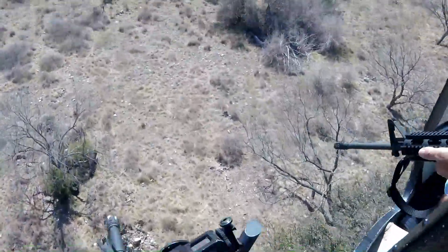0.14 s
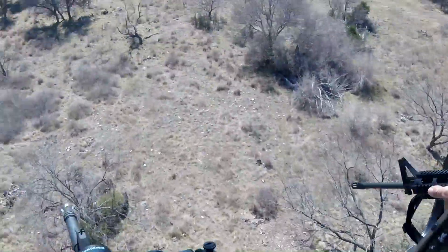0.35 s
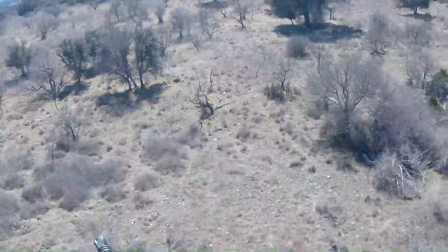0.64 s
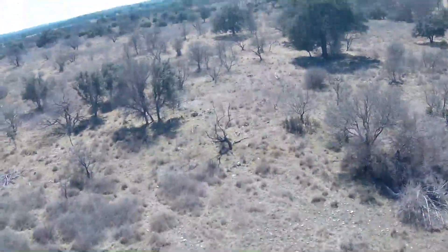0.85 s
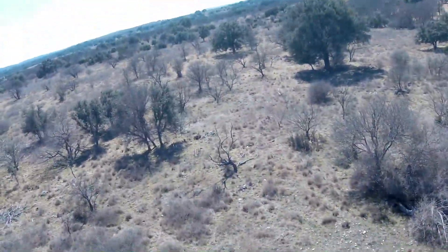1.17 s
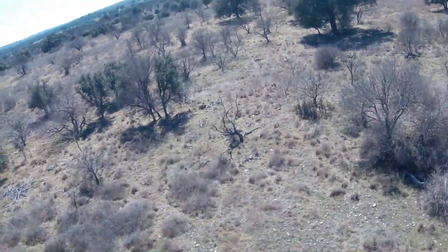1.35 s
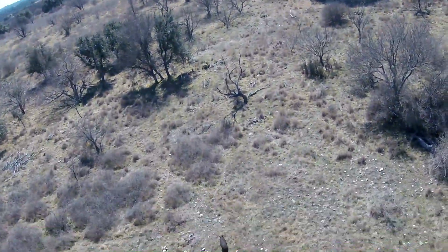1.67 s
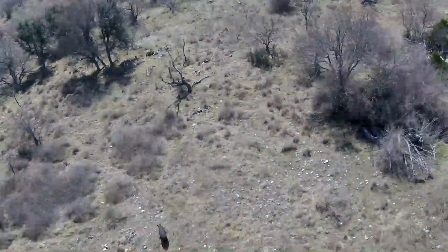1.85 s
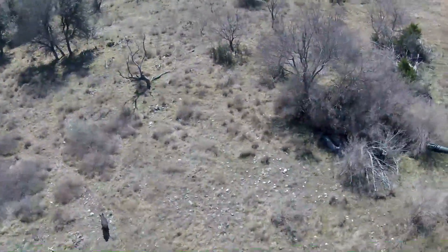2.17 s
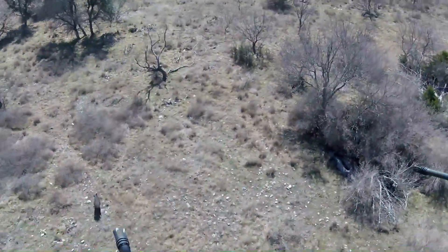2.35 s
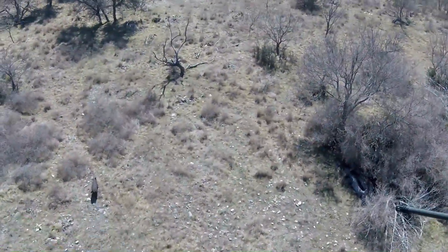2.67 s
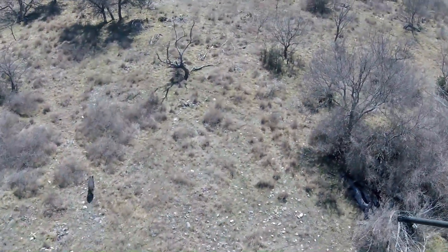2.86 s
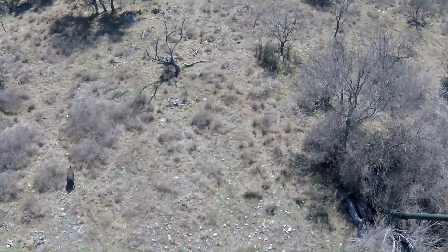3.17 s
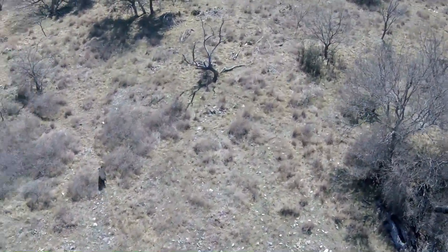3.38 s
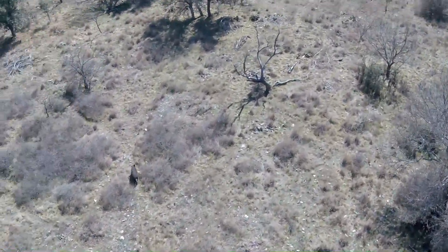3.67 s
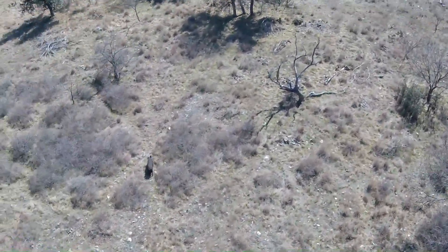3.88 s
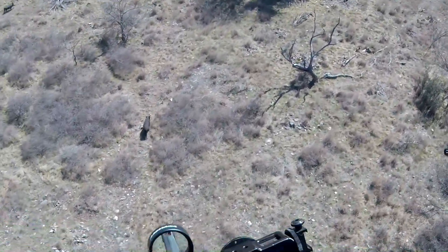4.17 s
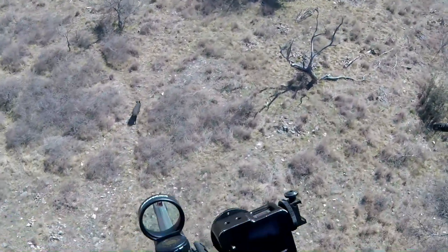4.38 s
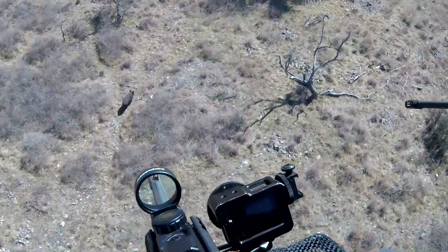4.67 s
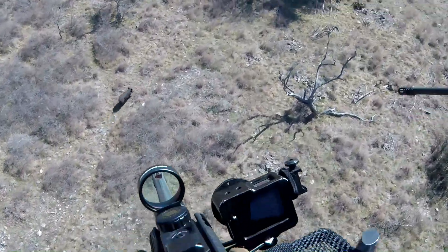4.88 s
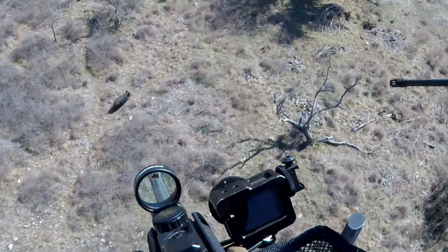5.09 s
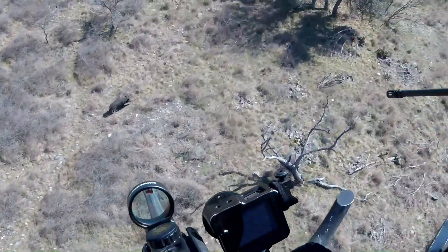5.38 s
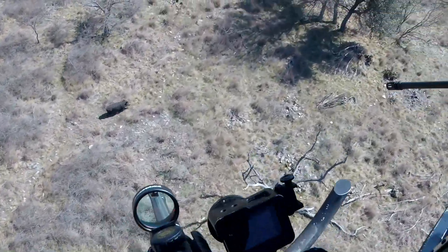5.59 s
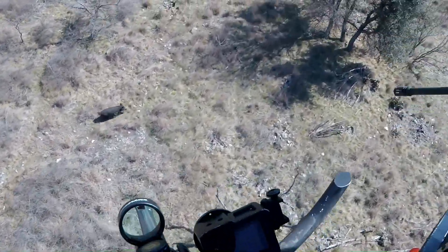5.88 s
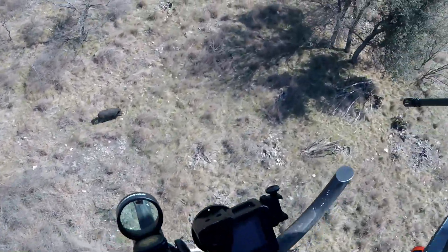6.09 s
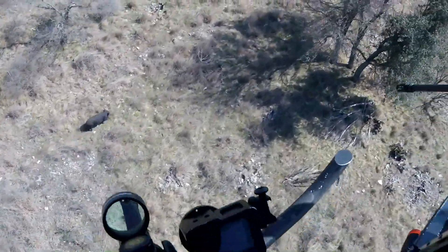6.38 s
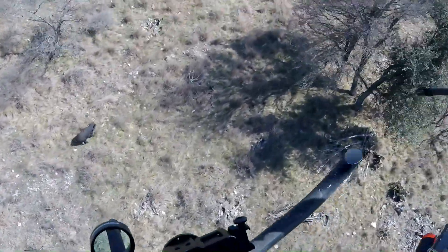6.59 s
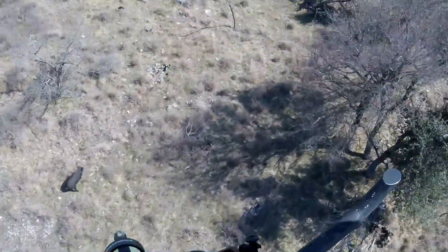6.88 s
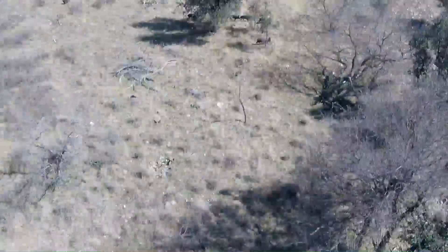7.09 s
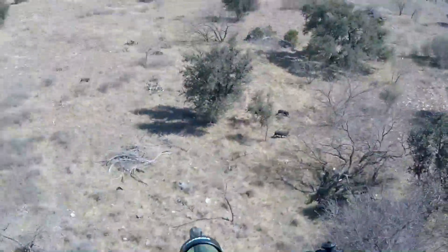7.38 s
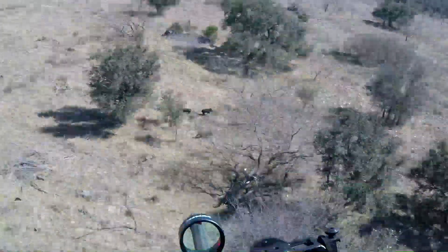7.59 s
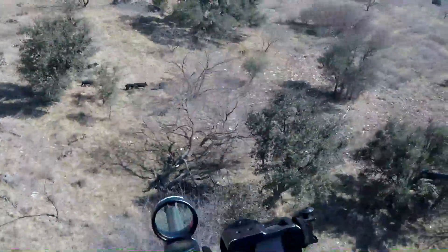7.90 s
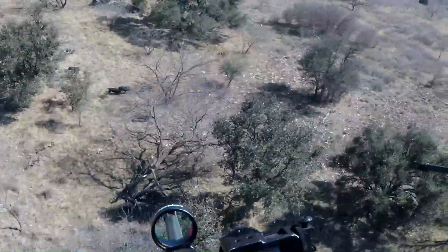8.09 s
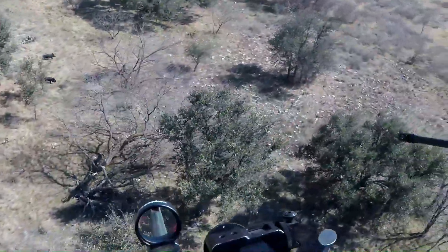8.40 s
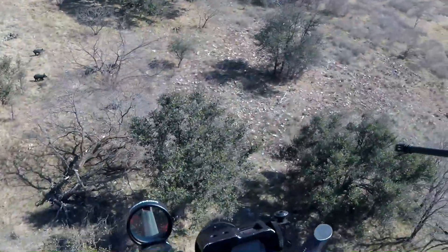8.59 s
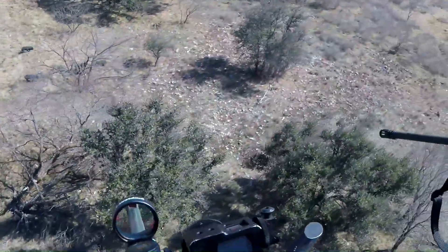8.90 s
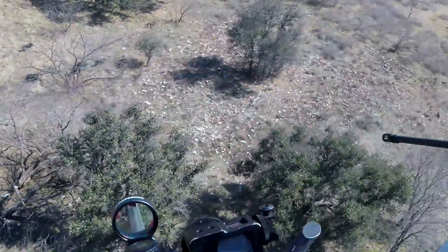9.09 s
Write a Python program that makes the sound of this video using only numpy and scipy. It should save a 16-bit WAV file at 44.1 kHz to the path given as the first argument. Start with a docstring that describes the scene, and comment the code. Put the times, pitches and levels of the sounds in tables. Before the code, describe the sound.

Four spaced rifle shots blast from the open door of a low-flying helicopter, with droning engine, fluttering blades and roaring wind.

```python
"""Four rifle shots from the open door of a two-blade piston helicopter flying low over brush.
A grating, fluttering rasp swells just ahead of each blast of noise; a cabin boom, a metal tick and a
ground thump follow. Underneath, shaft harmonics drone, each blade pass swishes and chirps, and shaped
noise makes the slipstream, with gusts, slaps, midrange swells and a hoot at the door. A few clicks and
rattles sit in the cabin. Gain control ducks the mix after each shot and creeps back."""
import sys
import numpy as np
from scipy import signal
from scipy.fft import rfft, irfft
from scipy.io import wavfile
from scipy.ndimage import uniform_filter1d, minimum_filter1d

SR = 44100
rng = np.random.default_rng(int(sys.argv[2]) if len(sys.argv) > 2 else 0)


def dump(signal):
    """Clip the signal to [-1, 1] and save it as 16-bit WAV at the path in sys.argv[1]."""
    limited = np.clip(np.atleast_2d(signal).T, -1, 1)
    pcm = np.round(limited * 32767).astype(np.int16)
    wavfile.write(sys.argv[1], SR, pcm)


N = 407925
T = np.arange(N) / SR


def undb(db):
    """Level in dB to amplitude factor."""
    return 10 ** (np.asarray(db) / 20)


def unit(x):
    """Scale to rms 1."""
    return x / np.sqrt(np.mean(x ** 2))


def curves(table):
    """The columns of a table, joined by straight lines in time."""
    s, *columns = np.transpose(table)
    return [np.interp(T, s, column) for column in columns]


def noise(points, size=N):
    """Noise of rms 1 with a spectrum of (frequency [Hz], relative density [dB]) points."""
    hz, db = np.transpose(points)
    octave = np.log2(np.fft.rfftfreq(size, 1 / SR) + 1)
    colour = undb(np.interp(octave, np.log2(hz), db))
    return unit(irfft(rfft(rng.standard_normal(size)) * colour, size))


def walk(rate):
    """Smooth random drift of rms near 1, with about rate new targets per second."""
    k = max(int(SR / rate), 2)
    steps = np.repeat(rng.standard_normal(N // k + 1), k)
    return unit(uniform_filter1d(steps, k)[:N])


def fade(t, t60):
    """Dies away by 60 dB in t60 seconds."""
    return np.exp(-np.log(1000) * t / t60)


def onset(t, rise_s):
    """Rises from silence with time constant rise_s."""
    return 1 - np.exp(-t / rise_s)


def swells(table):
    """Sum of smooth bell-shaped swells, from rows of (time, half length, height)."""
    return sum(height * np.exp(-((T - s) / length) ** 2) for s, length, height in table)


def add(out, s, x):
    """Mix x into out from time s."""
    i = min(int(s * SR), N)
    out[i:i + len(x)] += x[:N - i]


def split_off(x, order, hz, kind):
    """The low or high part of x, without delay, so that x minus it leaves the rest."""
    return signal.sosfiltfilt(signal.butter(order, hz, kind, fs=SR, output="sos"), x)


def passing(blade, lead, depth_db, uneven_db):
    """Level in dB that peaks once a blade, lead passes early; one blade is louder than the other."""
    angle = np.pi * (blade + lead)
    return depth_db * (np.cos(2 * angle) + 0.18 * np.cos(4 * angle)) + uneven_db * np.cos(angle)


# Main rotor speed: (time [s], blade passes [Hz])
ROTOR_SPEED = [(0.0, 13.52), (1, 13.633), (2.0, 13.383), (3.0, 13.145), (3.6, 12.995), (4.5, 13.253),
               (5.5, 13.753), (6.5, 13.743), (7.7, 13.904), (9.25, 13.688)]


def rotor_phase():
    """The turning rotor, counted in blade passes; it times everything geared to or beaten by the rotor."""
    return np.cumsum(curves(ROTOR_SPEED)[0]) / SR


def drone(turns, orders, waver_db):
    """Harmonics of a shaft; turbulent air makes each waver in level and phase."""
    out = np.zeros(N)
    for k, db in orders:
        level = undb(db + waver_db * walk(7))
        phase = 2 * np.pi * (k * turns + rng.random()) + 0.17 * walk(9)
        out += level * np.sqrt(2) * np.sin(phase)
    return out


# Exhaust harmonics: (multiple of the cycle of three cylinders, relative level [dB])
EXHAUST_ORDERS = [(1, -2), (2, -0.5), (3, -7), (4, -7.5), (5, -9.5), (6, -8.5), (7, -14), (11, -18.5)]
# Rotor harmonics: (multiple of that rotor's blade rate, relative level [dB])
MAIN_ROTOR_ORDERS = [(1, -4.5), (2, -5), (3, -1.5), (4, -5.5), (8, -4.5)]
TAIL_ROTOR_ORDERS = [(1, 0), (2, -5.5), (3, -13.5), (4, -17.5), (5, -27), (6, -22)]
# Fader of the engine and rotor drone: (time [s], level [dB])
DRONE_LEVEL = [(0, -14), (.35, -14), (.8, -15.5), (1.4, -16), (1.75, -19), (2.35, -18), (2.9, -19),
               (3.6, -18.5), (4.4, -19), (4.87, -27), (5.5, -18.5), (6.1, -15), (6.5, -24), (7.2, -18),
               (8, -20), (9.15, -17)]
EXHAUST_RATIO, TAIL_RATIO = 5, 5.93  # cycles per main blade pass


def machine(blade):
    """Exhaust, main rotor and tail rotor, all geared to one shaft."""
    lines = undb(0.5) * drone(EXHAUST_RATIO * blade, EXHAUST_ORDERS, waver_db=1.5)
    lines += undb(-2.5) * drone(blade, MAIN_ROTOR_ORDERS, waver_db=3.5)
    lines += undb(-1.5) * drone(TAIL_RATIO * blade, TAIL_ROTOR_ORDERS, waver_db=2.5)
    return lines * undb(curves(DRONE_LEVEL)[0])


# Gusts that swell the buffeting, and lulls below zero: (time [s], half length [s], level change [dB])
GUST_SWELLS = [(0.997, 0.15, 7.5), (4.554, 0.29, 8.5), (6.042, 0.3, 14.5), (6.62, 0.44, -9),
               (7.155, .15, 9), (0.05, .2, 3), (1.194, 0.14, 5), (4.735, 0.036, 5), (4.84, .05, -9)]


def gusts():
    """Level in dB that gusts on the microphone add to the buffeting, each a smooth swell."""
    return swells(GUST_SWELLS)


# Slipstream at the door: (time [s], strength [dB], brightness [dB])
SLIPSTREAM = [(0, -2.5, 2.5), (.35, 5, 1), (.8, 2, 0), (1.3, 2, 4.5), (1.75, 0.5, 4.5), (2.35, 2, -2),
              (2.9, -1, 0.5), (3.6, -2.5, 4), (4.5, 0, 2), (4.66, -6, 0), (4.87, -12, 1), (5.5, -1.5, 3),
              (6.15, -1.5, 2), (6.5, -7, 4), (6.8, -8, 6), (7.4, -0.5, -4), (8, -0.5, -1.5), (9.15, 3, 1)]
# Colours of its low, middle and high layers: (frequency [Hz], relative density [dB])
BUFFET_COLOUR = [(8, -20), (18, -20), (35, 10), (65, 3), (110, -3), (170, -16.5), (300, -22.5), (700, -63)]
ROAR_COLOUR = [(60, -28), (130, 2.5), (230, -0.5), (400, -2), (560, -5.5), (820, -7.5), (1200, -14),
               (1800, -30.5), (3500, -34.5), (8000, -80)]
RUSH_COLOUR = [(400, -46), (1000, 3.5), (1600, 6), (2300, 0.5), (3000, -2.5), (4000, -12.5), (5300, -4.5),
               (6300, -13), (8500, -30), (10500, -22), (11800, -31), (15000, -31)]
BUFFET_DB, ROAR_DB, RUSH_DB = -17.5, -14.5, -30  # base levels, before wind and flutter
BUFFET_FOLLOWS, RUSH_FOLLOWS = 0.24, 0.49  # dB per dB of wind strength
ROAR_THINS, ROAR_BODY_HZ = 0.3, 426  # dB of roar body lost per dB of brightness; top of that body


def slipstream(blade):
    """Eddies tear past the door; each blade pushes a gust of downwash through them."""
    wind_db, bright_db = curves(SLIPSTREAM)
    downwash = passing(blade, lead=0.0058, depth_db=1.4, uneven_db=-0.16)
    eddies = walk(130)

    buffet_db = BUFFET_DB + BUFFET_FOLLOWS * wind_db + gusts() + 0.97 * walk(7.3)
    buffet = noise(BUFFET_COLOUR) * undb(buffet_db)

    roar_db = ROAR_DB + wind_db + downwash + 1.8 * eddies + 0.28 * walk(18)
    roar = noise(ROAR_COLOUR) * undb(roar_db)
    body = split_off(roar, 2, ROAR_BODY_HZ, "low")
    roar = roar - body + body * undb(-ROAR_THINS * bright_db)

    rush_db = RUSH_DB + RUSH_FOLLOWS * wind_db + bright_db
    rush_db += 0.64 * downwash + 0.92 * eddies + 0.5 * walk(6.9)
    rush = noise(RUSH_COLOUR) * undb(rush_db)
    # the blades chop the treble of the rush more deeply
    treble = split_off(rush, 2, 3600, "high")
    rush = rush - treble + treble * undb(passing(blade, lead=0.081, depth_db=2.0, uneven_db=0.8))
    # pressure waves of the exhaust chop the rush into a fine rattle
    exhaust = np.cos(2 * np.pi * EXHAUST_RATIO * blade)
    return buffet + roar + rush * undb(2.04 * exhaust)


def whistle(hz, width_hz):
    """A narrow band of noise around a moving pitch."""
    angle = 2 * np.pi * np.cumsum(hz + 110 * walk(1100) + 90 * walk(16)) / SR
    return unit(walk(width_hz) * np.sin(angle) + walk(width_hz) * np.cos(angle))


# Base levels of the blade noise, before the per-blade pulsing: (time [s], swish [dB], chirp [dB])
BLADE_LEVELS = [(0, -45.5, -41), (.8, -35, -42), (1.4, -42.5, -38), (2.1, -42, -41), (3.4, -39, -41.5),
                (4.2, -42, -41.5), (4.7, -43.5, -45), (5.5, -38, -40.5), (6.2, -45, -43), (6.8, -47, -52),
                (7.5, -41.5, -46), (8.2, -41.5, -39.5)]
# Colour of the swish: (frequency [Hz], relative density [dB])
SWISH_COLOUR = [(2000, -11), (4000, 1.5), (5500, 1), (7000, 0.5), (8500, 0.5), (10200, -3.5), (11600, -23),
                (14000, -15), (16000, -28)]
CHIRP_HZ, CHIRP_SWING, CHIRP_FALL = 4910, 0.093, 0.17  # centre; Doppler share of it; half fall [blade passes]


def blades(blade):
    """Each passing blade hisses, bright first and duller after, and gives a soft falling chirp."""
    swish_db, chirp_db = curves(BLADE_LEVELS)
    hiss = noise(SWISH_COLOUR)
    bright = split_off(hiss, 3, 7700, "high")
    swish = bright * undb(passing(blade, lead=0.077, depth_db=3.5, uneven_db=1.3))
    swish += (hiss - bright) * undb(passing(blade, lead=-0.11, depth_db=2.5, uneven_db=0.5))
    # the tip comes and goes, so its bands of noise drop quickly as it passes
    past = (blade + 0.72) % 1 - 0.7
    fall = np.tanh(past / CHIRP_FALL)
    swish += undb(2) * whistle(7600 - 1300 * fall, width_hz=1400) * np.exp(-(past / 0.18) ** 2)
    chirp = whistle(CHIRP_HZ * (1 - CHIRP_SWING * fall), width_hz=700)
    pulse_db = passing(blade, lead=0.15, depth_db=7.5, uneven_db=0.9)
    chirp *= undb(chirp_db + pulse_db + 1.0 * walk(10))
    return swish * undb(swish_db + 3.5 + 0.6 * walk(11)) + chirp


# Wind across the door frame: (time [s], hoot pitch before wobble [Hz], hoot [dB], hiss before pulsing [dB])
DOOR_FRAME = [(2.8, 77.8, -39, -47), (3.2, 75.9, -28, -48), (3.9, 83.9, -14.5, -35.5),
              (4.3, 91.9, -20, -37.5), (4.6, 95.7, -40, -35.5), (4.76, 103, -14, -38),
              (4.86, 97.26, -58, -82)]
# Colour of its hiss: (frequency [Hz], relative density [dB])
EDGE_COLOUR = [(3500, -29), (5200, -4), (6000, 6.5), (7500, 3.5), (8700, 1), (9500, -12), (12000, -35)]


def sideslip(blade):
    """Eddies shed from the door frame give a ragged hoot, mostly rising, and a hiss pulsed by the downwash."""
    hz, hoot_db, hiss_db = curves(DOOR_FRAME)
    ragged = 1 + 0.32 * walk(16)
    hoot = unit(ragged * np.sin(2 * np.pi * np.cumsum(hz + 6 * walk(25)) / SR))
    chop_db = passing(blade, lead=-0.06, depth_db=2.0, uneven_db=-0.5)
    hiss = noise(EDGE_COLOUR) * undb(hiss_db + chop_db + 1.5 * walk(22.58))
    return hoot * undb(hoot_db) + hiss


# Slaps of downwash: (time [s], level before the fade [dB], decay by 60 dB [s])
SLAP_HITS = [(.058, -6, .11), (.136, -5, .1), (.209, -5, .055), (1.31, -3, .07), (2.762, -12, .07),
             (2.835, -12, .06), (3.25, -7, .035), (3.279, -5, .04), (3.631, -6, .04), (4.464, -8, .04),
             (4.71, -9, .035), (4.747, -9, .06), (7.117, -8, .045), (7.411, -6, .05), (7.63, -7, .04),
             (7.769, -9, .035), (8.055, -7, .035), (9.157, -4, .04)]
# Colour of a slap: (frequency [Hz], relative density [dB])
SLAP_COLOUR = [(120, 0), (350, 18), (800, 14), (1400, 6), (2800, -5), (5000, -22), (10000, -38)]


def slaps(size=4096):
    """Downwash slaps the microphone now and then: short dull bursts of noise."""
    out, t = np.zeros(N), np.arange(size) / SR
    for s, db, t60 in SLAP_HITS:
        add(out, s, undb(db) * noise(SLAP_COLOUR, size=size) * fade(t, t60) * onset(t, 0.0005))
    return out


# Swells of midrange noise on top of the roar: (time [s], half length [s], level [dB])
MIDRANGE_SWELLS = [(.55, .15, -22), (1.023, 0.036, -16.5), (2.454, 0.26, -19.5), (4.56, 0.054, -23),
                   (5.66, 0.17, -22), (6.76, 0.5, -22)]
# Colour of that noise: (frequency [Hz], relative density [dB])
MIDRANGE_COLOUR = [(250, -23), (550, 4.5), (820, 1.5), (1250, -3), (1700, -18.5), (3000, -40)]


def midrange_swells():
    """A band of midrange noise, fluttering in level, swells and fades on top of the roar."""
    swell = swells([(s, length, undb(db)) for s, length, db in MIDRANGE_SWELLS])
    return noise(MIDRANGE_COLOUR) * swell * undb(2.2 * walk(110))


def rasp(modes, length, flutter_s=0.011, swell_s=0.0035, size=4096):
    """A fluttering ring in coarse grit over a low growl swells until the blast, which its last sample meets."""
    before = np.arange(size)[::-1] / SR  # time left until the blast
    flutter = 2 * np.pi * before / flutter_s
    phases = 2 * np.pi * rng.random((len(modes), 3))
    ring = np.zeros(size)
    for (hz, db), (a, b, c) in zip(modes, phases):
        # each mode wobbles in level and pitch with the flutter
        level = undb(db) * (1 + 0.5 * np.cos(flutter + a / 2))
        ring += level * np.sin(2 * np.pi * hz * before + b + np.sin(flutter + c))
    grit = noise([(800, -6), (2000, 0), (5000, -3), (8000, -9), (11000, -5), (15000, -11)], size=size)
    growl = noise([(40, -30), (130, 6), (260, 5), (500, -21), (1200, -34)], size=size)
    swell = 1 / (1 + np.exp((before - length) / swell_s))
    swell += undb(-17) * np.exp(-(before / (length + 0.012)) ** 4)
    return (unit(ring) + undb(-15) * grit + undb(-2) * growl) * swell


# Colour of the cabin after a shot: (frequency [Hz], relative density [dB])
BOOM_COLOUR = [(60, 0), (140, 16), (250, 9), (400, -6), (560, -8), (830, 11), (1150, -4), (3000, -32)]


def cabin_boom(t60=0.07, size=16384):
    """The blast sets the air of the cabin booming: coloured noise with a soft onset, dying away."""
    t = np.arange(size) / SR
    return noise(BOOM_COLOUR, size=size) * fade(t, t60) * onset(t, 0.0009)


def tick(t60, size=2048):
    """A short bright click of hard parts."""
    t = np.arange(size) / SR
    colour = [(800, -25), (1800, -7), (2800, -10), (4500, -4.5),
              (6000, 3.0), (8000, -3.0), (11000, -14), (15000, -28)]
    return noise(colour, size=size) * fade(t, t60) * onset(t, 0.001)


# Colour of the returning crack: (frequency [Hz], relative density [dB])
ECHO_COLOUR = [(100, 7), (500, 2), (1200, -19), (2500, -20), (5000, -24), (8000, -30), (12000, -70)]


def ground_echo(drop_hz=1200, end_hz=140, drop_s=0.0016, t60=0.036, crack_db=-13, size=4096):
    """The report comes back from soil and brush as a soft crack and a dull thump of falling pitch."""
    t = np.arange(size) / SR
    hz = end_hz + drop_hz * np.exp(-t / drop_s)
    thump = np.sin(2 * np.pi * np.cumsum(hz) / SR) * onset(t, 0.004) * fade(t, t60)
    crack = noise(ECHO_COLOUR, size=size) * onset(t, 0.001) * fade(t, 0.06)
    return thump + undb(crack_db) * crack


# Shots, levels before the gain control: (time [s], blast [dB], blast decay by 60 dB [s], cabin boom [dB],
# rasp [dB], rasp length [s], tick delay [s], tick [dB], ground echo [dB])
RIFLE_SHOTS = [(1.0776, 17, .028, 9, -9, .025, .0515, -10, 19),
               (5.8156, 19, .034, 9, -7.5, .027, .054, -12, 19),
               (6.2722, 7, .045, 14, -4.5, .011, .0455, -5, 9),
               (9.2215, 15, .034, 8, -6, .025, .046, -11, 12)]
# Ring of the rasp ahead of each blast, one list a blast: (frequency [Hz], relative level [dB])
RASP_MODES = [
    [(1800, 2), (2250, -4), (2500, 0), (3030, -5), (3310, 5), (4500, -6), (5400, 3), (6080, -11),
     (6420, -3), (7500, -4), (8500, -5), (9130, -8)],
    [(1420, 4), (2030, 4), (2230, 4), (2560, -4), (2970, 2), (3540, 4), (4870, 0), (5070, -2), (6470, -11),
     (7080, -13), (8600, -14)],
    [(1990, 2), (2470, 0), (2760, -3), (3260, 4), (3560, 1), (4720, -5), (5370, 5), (6150, -2), (8800, -10),
     (10170, -6)],
    [(1340, 4), (1650, -7), (1980, 5), (2500, -6), (2960, 2), (3550, 3), (3890, -9), (4420, -3), (4740, -8),
     (5580, -11), (6930, -7), (8350, -11)],
]
# Colour of the muzzle blast: (frequency [Hz], relative density [dB])
BLAST_COLOUR = [(30, -12), (150, 9), (500, 7), (900, 9), (1500, 3), (3000, -2), (6000, -4), (8000, -7),
                (9500, -13), (12000, -22), (16000, -25)]
ECHO_AFTER_S, TICK_T60_S = 0.074, 0.022


def rifles(size=16384):
    """Muzzle blast with a rasp just ahead of it and a short cabin tail, a tick of metal, then the ground echo."""
    out, t = np.zeros(N), np.arange(size) / SR
    for shot, modes in zip(RIFLE_SHOTS, RASP_MODES):
        s, blast_db, t60, boom_db, rasp_db, length, tick_after, tick_db, echo_db = shot
        ring = rasp(modes, length)
        add(out, s - len(ring) / SR, undb(rasp_db) * ring)
        blast = noise(BLAST_COLOUR, size=size) * (fade(t, t60) + undb(-23) * fade(t, 0.094))
        add(out, s, undb(blast_db) * blast + undb(boom_db) * cabin_boom())
        add(out, s + tick_after, undb(tick_db) * tick(t60=TICK_T60_S))
        add(out, s + ECHO_AFTER_S, undb(echo_db) * ground_echo())
    return out


# Bursts of chatter: (time [s], half length [s], level [dB])
RATTLE_BURSTS = [(2.768, .01, -26), (2.835, .014, -25), (2.92, .015, -29), (2.978, .01, -25)]
# Colour of the ringing part: (frequency [Hz], relative density [dB])
RATTLE_COLOUR = [(1300, -8), (2300, -4), (2950, 12), (3400, 2), (4200, -6), (7000, -6), (11000, -22)]


def rattle(uneven_db=4.0):
    """A small ringing part chatters unevenly in short bursts."""
    bursts = swells([(s, length, undb(db)) for s, length, db in RATTLE_BURSTS])
    return unit(noise(RATTLE_COLOUR) * undb(uneven_db * walk(300))) * bursts


# Sharp clicks in the cabin: (time [s], level before the fade [dB])
CLICK_HITS = [(2.938, -24), (3.122, -11.5), (9.151, -30)]


def cabin_clicks():
    """Sharp clicks in the cabin, each a short bright burst of noise."""
    out = np.zeros(N)
    for s, db in CLICK_HITS:
        add(out, s, undb(db) * tick(t60=0.058))
    return out


def scene():
    """One rotor phase, counted in blade passes, paces the machine, its blade noise and its downwash."""
    blade = rotor_phase()
    helicopter = machine(blade) + blades(blade)
    wind = slipstream(blade) + sideslip(blade) + slaps() + midrange_swells()
    cabin = rattle() + cabin_clicks()
    return (helicopter + wind + rifles() + cabin)[None]


def hold(over_db, release_db_per_s):
    """Follows each peak at once and lets go at a steady rate."""
    ramp = release_db_per_s * T
    return np.maximum.accumulate(over_db + ramp) - ramp


def limit(x, ceiling=1.25, size=48):
    """A fast limiter turns peaks down toward the ceiling, starting about a millisecond ahead."""
    gain = ceiling / np.maximum(np.abs(x), ceiling)
    return x * uniform_filter1d(minimum_filter1d(gain, size), size)


MAX_DIP_DB, DIP_RELEASE_DB_PER_S = 27, 63  # quick dip
MAX_DUCK_DB, DUCK_RELEASE_DB_PER_S = 13, 9  # lasting duck, which also starts at full depth
ATTACK_S, TOP_HZ = 0.0028, 15400  # time constant that smooths the gain; top of the final low-pass


def record(dry, threshold_db=-3.5, quick_share=1.35, slow_share=0.9, top_rolloff_hz=10500):
    """Gain control, a quick dip and a lasting duck, lags the blast, which is limited and rounded off."""
    x = dry[0]
    # power over the latest 128 samples
    power = np.abs(uniform_filter1d(x ** 2, size=128, origin=63)) + 1e-12
    over_db = np.maximum(10 * np.log10(power) - threshold_db, 0)
    quick_db = np.minimum(quick_share * over_db, MAX_DIP_DB)
    lasting_db = np.minimum(slow_share * over_db, MAX_DUCK_DB)
    lasting_db[0] = MAX_DUCK_DB
    duck_db = np.maximum(hold(quick_db, DIP_RELEASE_DB_PER_S), hold(lasting_db, DUCK_RELEASE_DB_PER_S))
    pole = np.exp(-1 / (ATTACK_S * SR))
    smooth_db = signal.lfilter([1 - pole], [1, -pole], duck_db, zi=[pole * duck_db[0]])[0]
    limited = limit(x * undb(-smooth_db))
    clipped = limited / (1 + (limited / 0.95) ** 6) ** (1 / 6)  # soft clip
    softened = signal.sosfilt(signal.butter(2, top_rolloff_hz, fs=SR, output="sos"), clipped)
    return signal.sosfilt(signal.ellip(8, 0.2, 80, TOP_HZ, fs=SR, output="sos"), softened)[None]


dry = scene()
out = record(dry)
dump(out)
```